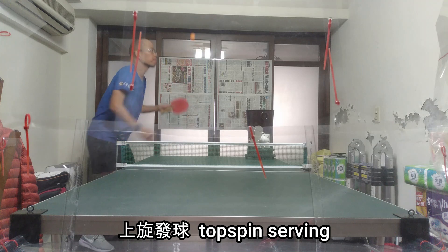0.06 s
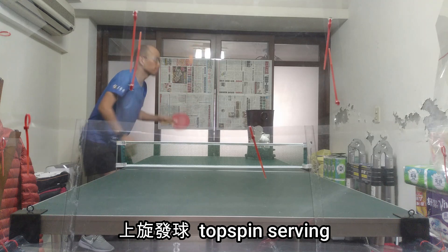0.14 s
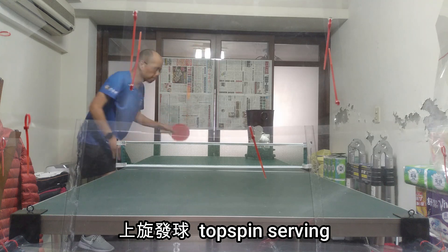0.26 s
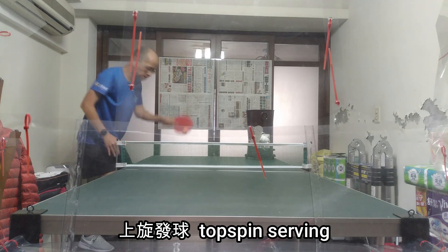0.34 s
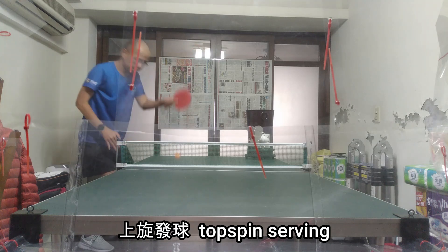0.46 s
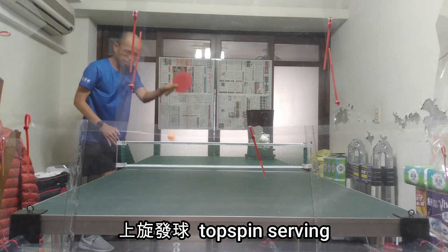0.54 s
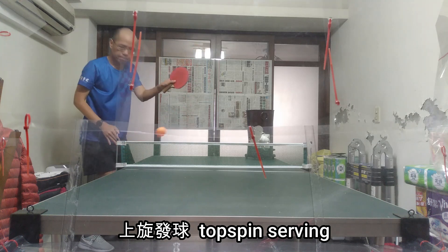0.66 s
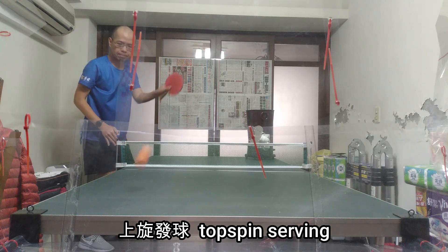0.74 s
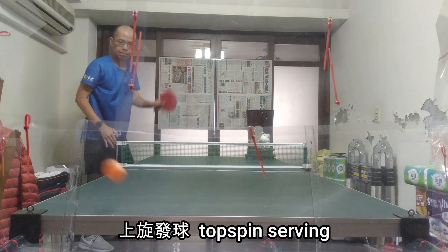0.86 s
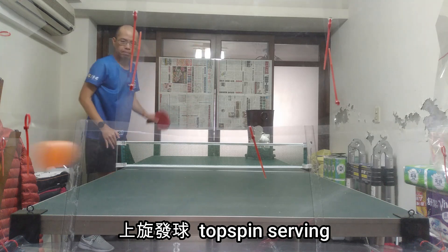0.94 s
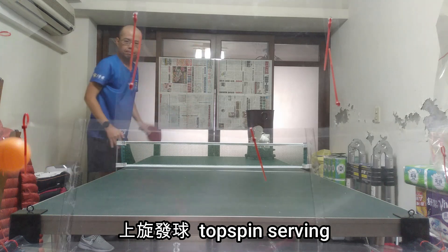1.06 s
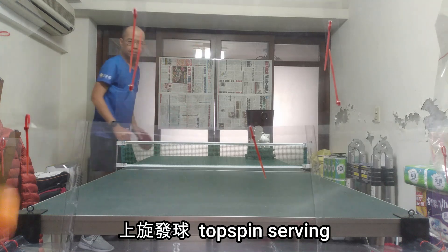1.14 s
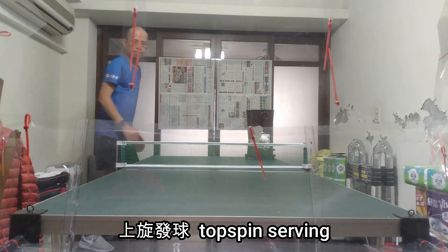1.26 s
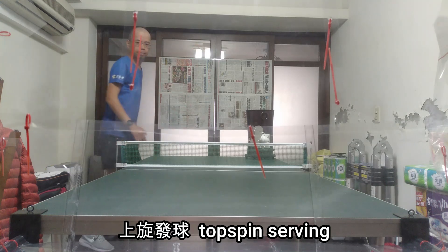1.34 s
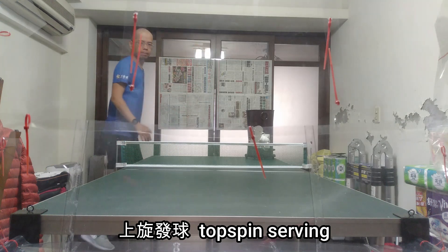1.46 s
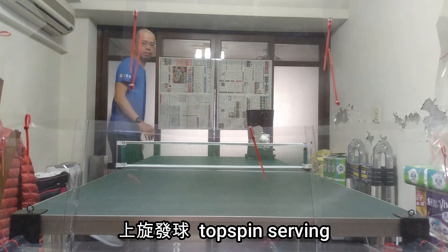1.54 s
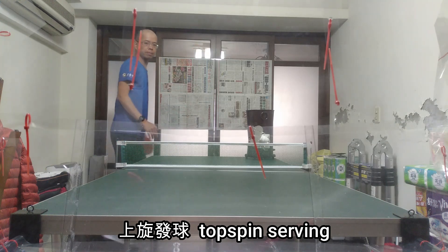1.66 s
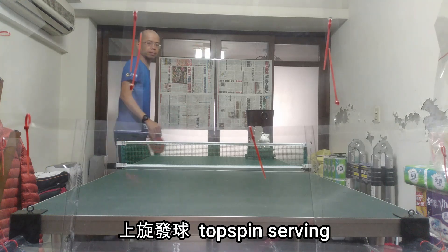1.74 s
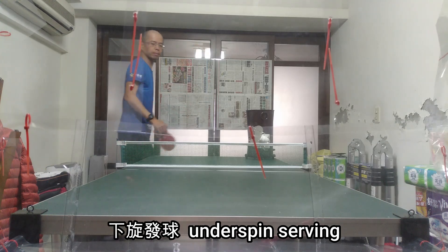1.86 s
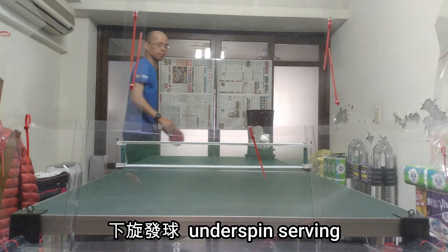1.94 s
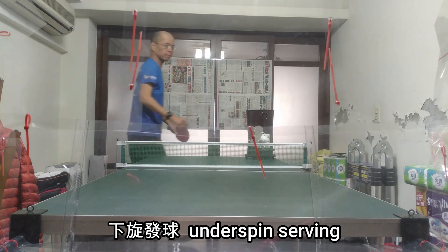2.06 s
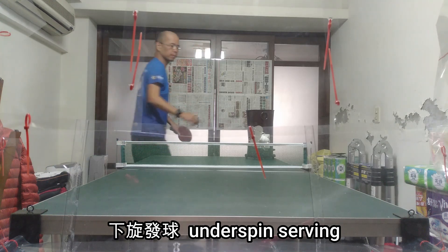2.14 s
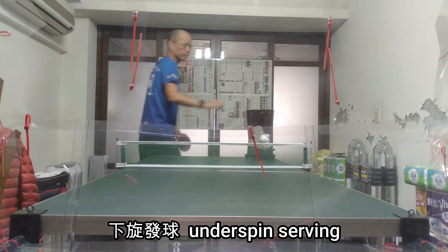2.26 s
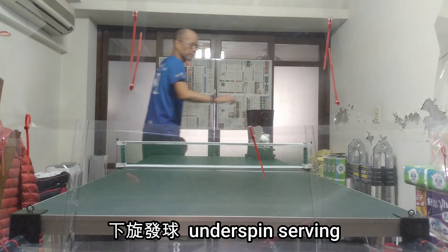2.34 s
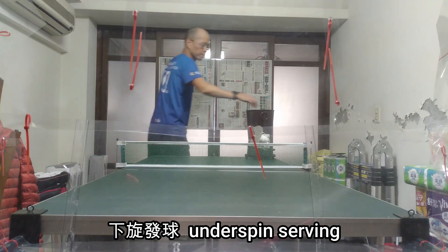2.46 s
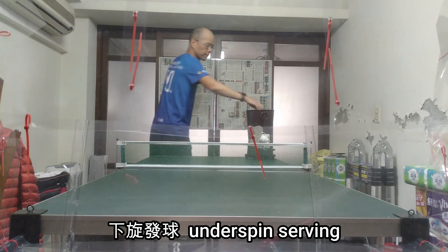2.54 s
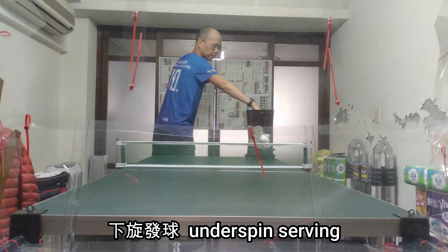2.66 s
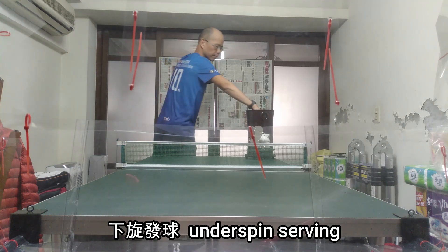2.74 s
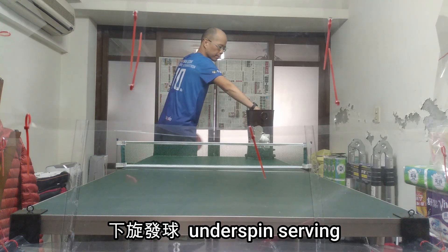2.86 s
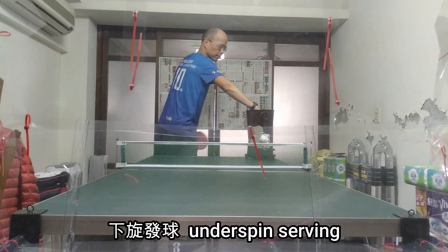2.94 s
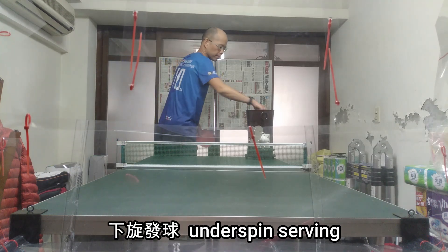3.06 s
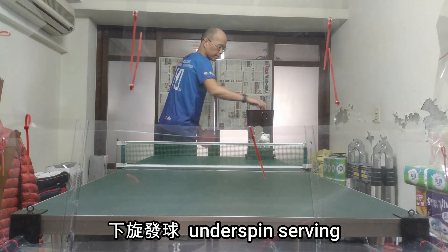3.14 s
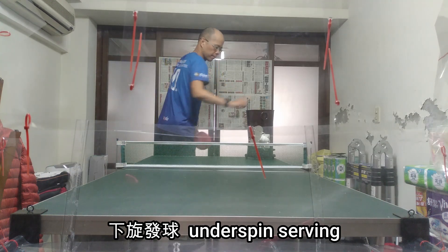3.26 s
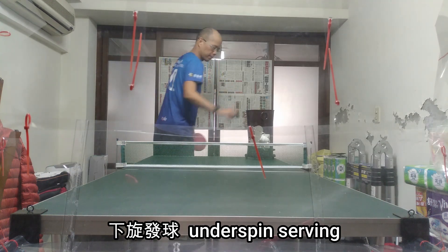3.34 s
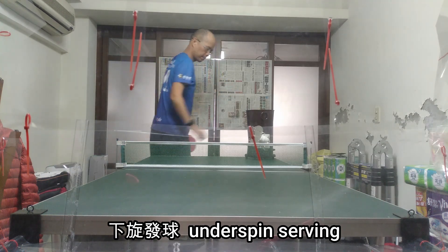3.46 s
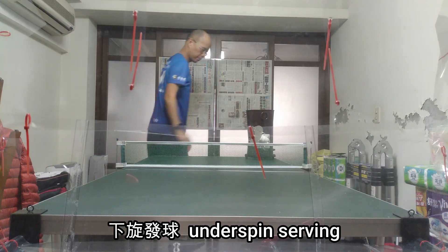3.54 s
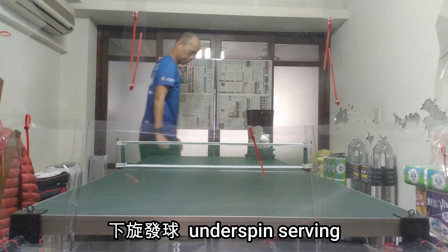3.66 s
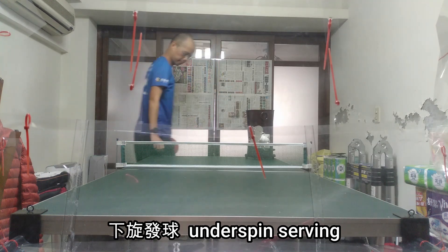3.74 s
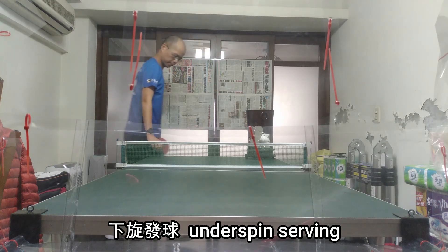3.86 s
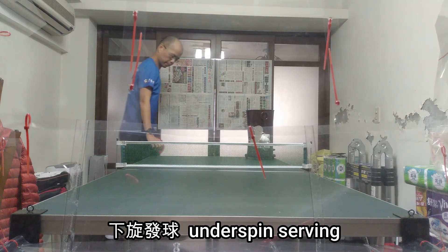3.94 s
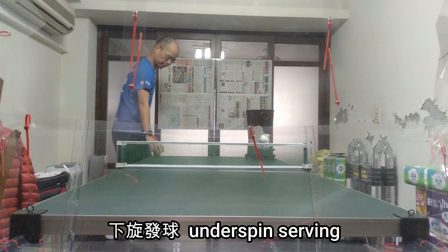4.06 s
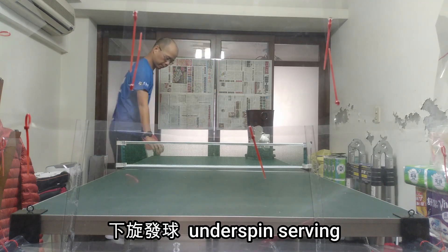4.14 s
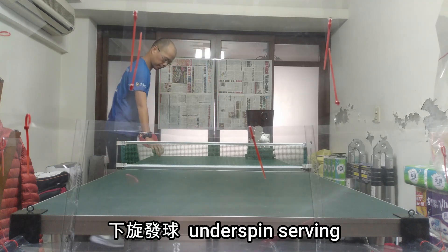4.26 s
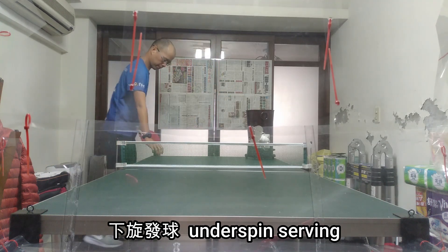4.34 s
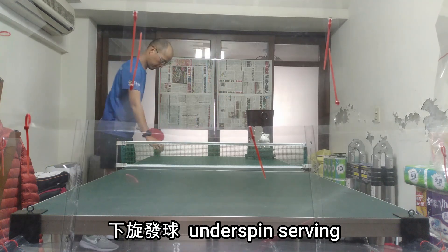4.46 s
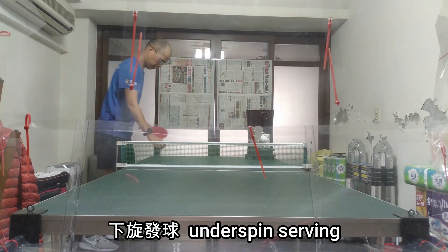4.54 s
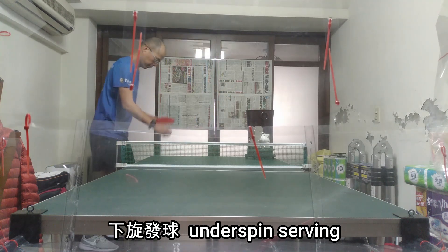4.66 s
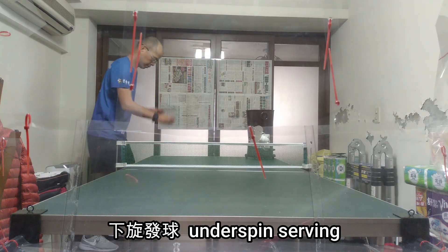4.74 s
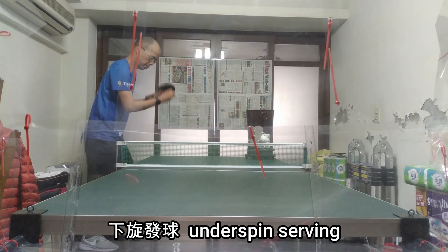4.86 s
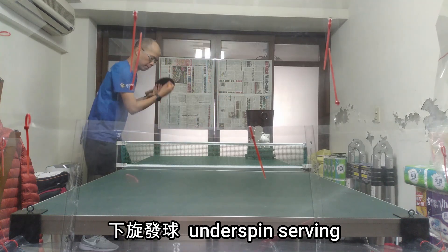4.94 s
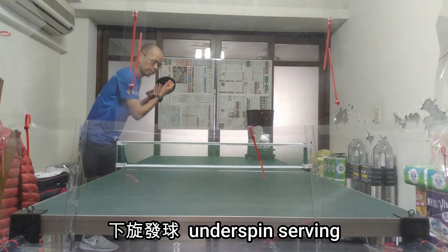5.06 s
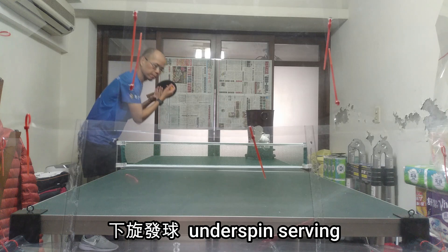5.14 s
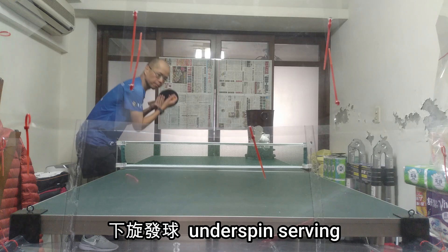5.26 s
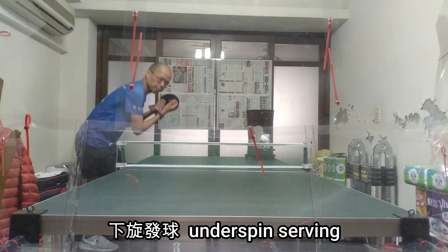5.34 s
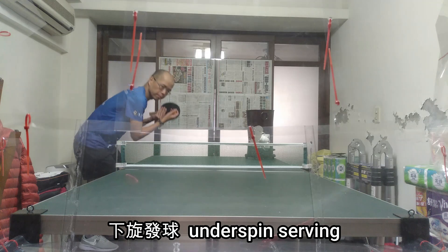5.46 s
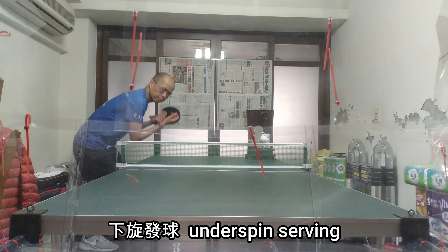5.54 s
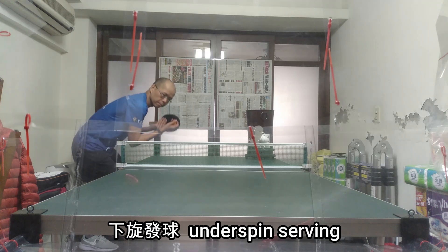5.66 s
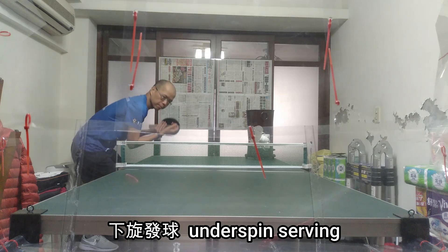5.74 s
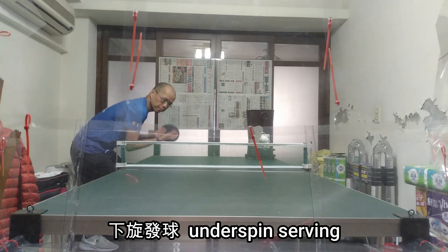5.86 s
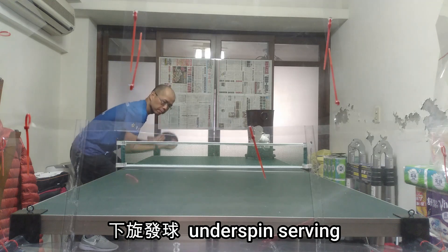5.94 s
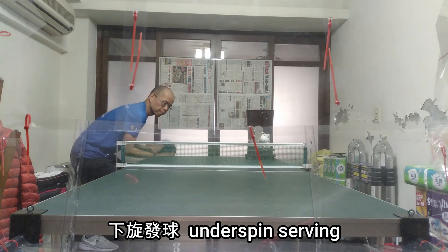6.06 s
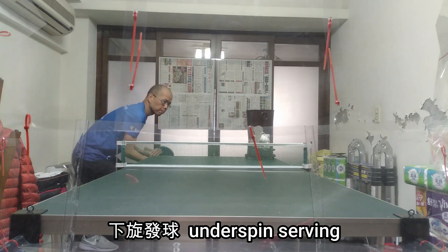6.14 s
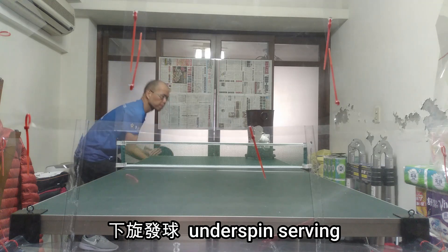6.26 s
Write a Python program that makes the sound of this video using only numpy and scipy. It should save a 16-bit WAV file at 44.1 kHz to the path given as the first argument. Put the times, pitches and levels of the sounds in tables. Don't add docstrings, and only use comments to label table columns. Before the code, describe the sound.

Small hard-walled room, one fixed microphone at the near end of a table. A hollow ball is struck and bounces crisply twice, hits the near panel with a loud dull smack, knocks it again, then falls to tile with tiny fading ticks. Later come faint basket clatter, two moderate ball bounces, soft footfalls and a short rubber squeak, over faint street rumble and hiss.

```python
import sys
import numpy as np
from scipy import signal
from scipy.fft import rfft, irfft
from scipy.io import wavfile
from scipy.ndimage import uniform_filter1d

SR = 44100
rng = np.random.default_rng(int(sys.argv[2]) if len(sys.argv) > 2 else 0)


def volts_from_db(level):
    exponent = np.asarray(level, float) / 20
    return 10 ** exponent


def unload_wav(signal):
    wavfile.write(
        sys.argv[1],
        SR,
        np.round(np.clip(np.atleast_2d(signal).T, -1, 1) * 32767).astype(np.int16),
    )


N = 277830
SIZE = 2 ** 15
HZ = np.fft.rfftfreq(SIZE, 1 / SR) + 1e-3


def colour(points, hz):
    at, db = np.transpose(points)
    return volts_from_db(np.interp(np.log(hz), np.log(at), db))


def causal(gain):
    ceps = irfft(np.log(gain + 1e-9))
    ceps[1:SIZE // 2] *= 2
    ceps[SIZE // 2 + 1:] = 0
    return np.exp(rfft(ceps))


def peak(hz, width_hz):
    return 1 / np.sqrt(1 + (2 * (HZ - hz) / width_hz) ** 2)


def band(x, lo_hz, hi_hz):
    sos = signal.butter(N=2, Wn=[lo_hz, hi_hz], btype="band", fs=SR, output="sos")
    y = signal.sosfilt(sos, x)
    return y / y.std()


def add(mix, s, sound):
    i = int(s * SR)
    mix[i:i + len(sound)] += sound[:N - i]


def ring(modes):
    t = np.arange(SIZE) / SR
    y = np.zeros(SIZE)
    for hz, db, t60 in modes:
        decay = volts_from_db(db - 60 * t / np.clip(t60, .01, .3))
        y += decay * np.sin(2 * np.pi * hz * t)
    return y / y[:SR // 20].std()


# f/Hz, t60/s, build-up/ms
ROOM = [(88.4, 0.44, 31), (172, 0.53, 10), (389.3, 0.41, 2.8), (1000, 0.49, 7.4), (2500, .5, 4),
        (5500, 0.5, 5), (9000, .43, 1.7), (12000, 0.44, 5), (15000, 0.44, 4)]


def echo(direct_db, crack_s, click_db=-38.0):
    mirror_s, mirror_db = .0016, -1.5
    t = np.arange(SIZE) / SR
    noise, luck, crack = rng.standard_normal(SIZE), rng.random(SIZE), rng.standard_normal(SIZE)
    density = np.clip(0.28 + (t / .03) ** 2, 0, 1)
    spectrum = rfft(noise * (luck < density) / np.sqrt(density))
    centres = np.log(np.array(ROOM)[:, 0])
    tail = np.zeros(SIZE)
    for k, (_, t60, rise_ms) in enumerate(ROOM):
        mask = np.interp(np.log(HZ), centres, np.arange(len(ROOM)) == k)
        envelope = volts_from_db(-60 * t / t60) * (1 - np.exp(-1000 * t / rise_ms))
        tail += irfft(spectrum * mask) * envelope
    crack = crack * np.exp(-t / crack_s) * (1 - np.exp(-t / 0.0012))
    click = volts_from_db(click_db) * (1 + volts_from_db(mirror_db) * np.exp(-2j * np.pi * HZ * mirror_s))
    tail = tail / np.linalg.norm(tail)
    crack = volts_from_db(direct_db) * crack / np.linalg.norm(crack)
    return click + rfft(tail + crack)


# f/Hz, width/Hz, level/dB
BOOM = [(98, 13, -24.5), (136.5, 9.9, 3), (215.5, 36, -8.5), (273.1, 25, -8)]
# f/Hz, width/Hz
SHELL = [(8290, 56), (8470, 74)]


def knocks(rows, tone, fill, offset_db, lead_s, boom_db, contact_ms=.6, harden=0., crack_s=.006,
           dull_hz=19000, rings=None, ring_db=0., click_db=-37.0):
    mix = np.zeros(N)
    modes = sum(volts_from_db(db) * peak(hz, 1.3 * width) ** 3 for hz, width, db in BOOM)
    boom = causal(modes * np.minimum(HZ / 75, 1) ** 2)
    shell = sum(peak(hz, width) ** 2 for hz, width in SHELL)
    null = 1 - 0.88 * peak(9230, width_hz=480) ** 2
    blur = np.clip(fill * (2500 / HZ) ** 1.2, 0, 1)
    for s, db, direct_db, *shell_db in rows:
        touch_ms = contact_ms * volts_from_db(-harden * (db - rows[0][1]))
        turns = 2 * HZ * touch_ms / 1000
        contact = np.cos(np.pi * turns / 2) * (1 + turns ** 2) / (1 - turns ** 2)
        heard_hz = HZ * touch_ms / .6
        body = colour(tone, heard_hz) * np.minimum(heard_hz / tone[0][0], 1) ** 2
        body = body / np.sqrt(1 + (HZ / dull_hz) ** 4)
        gain = body * np.sqrt((1 - blur) * (null * contact) ** 2 + blur)
        gain = gain + sum(volts_from_db(lift) for lift in shell_db) * shell
        sound = irfft(causal(gain) * echo(direct_db, crack_s, click_db) + volts_from_db(boom_db) * boom)
        sound = sound / sound[:SR // 20].std()
        if rings:
            sound = sound + volts_from_db(ring_db) * ring(rings)
        add(mix, s - lead_s, sound * volts_from_db(db + offset_db))
    return mix


# f/Hz, level/dB, t60/s
PADDLE = [(0.383, -23, -5, -14.5)]
PADDLE_TONE = [(300, -19.5), (440, -30.5), (540, -4), (750, -10), (1080, 0.4), (1500, -6.5), (2200, -11.5),
               (3450, -27), (7400, -26.5), (10000, -30), (15500, -43.5)]
PADDLE_RINGS = [(1083, 0, 0.35), (1206, -1.5, 0.71), (1440, -3.5, 0.21), (2170, -31, 5.0),
                (2422, -8, 0.083)]


def paddle():
    return knocks(PADDLE, PADDLE_TONE, fill=6.7, offset_db=-9.5, lead_s=0.0025, boom_db=-26,
                  crack_s=0.0084, click_db=-16, rings=PADDLE_RINGS, ring_db=-7)


# t/s, level/dB, direct/dB, shell ring/dB
TABLE = [
    (.505, -20, -8.5, -6.5),
    (.855, -21.5, -16, -20),
]
# f/Hz, level/(dB per Hz)
TABLE_TONE = [(110, -16), (170, -1.5), (380, -3), (800, 0.5), (1350, -7), (3300, -14.5), (5000, -15),
              (7000, -16.5), (9800, -17), (11400, -25), (15500, -42.5)]


def table():
    return knocks(TABLE, TABLE_TONE, fill=0.29, offset_db=-9.5, lead_s=0.0017, boom_db=8,
                  click_db=-18.5, contact_ms=.606, harden=0.24)


# t/s, level/dB
HUMS = [
    (.515, -36.5),
    (1.07, -40),
    (1.29, -56.5),
]


def hums():
    hum_hz, rise_s, t60_s = 91, 0.028, .75
    mix, t = np.zeros(N), np.arange(SIZE) / SR
    for s, db in HUMS:
        envelope = volts_from_db(db - 60 * t / t60_s) * (1 - np.exp(-t / rise_s))
        add(mix, s, envelope * np.sin(2 * np.pi * hum_hz * t))
    return mix


# t/s, level/dB, direct/dB, shell ring/dB
PANEL = [
    (1.029, -10.5, -1, -39),
    (1.291, -18, -15.5, -50),
]
# f/Hz, level/(dB per Hz)
PANEL_TONE = [(60, -7.5), (240, -9), (450, -7), (640, -2.5), (950, -6), (1700, -7.5), (3000, -12),
              (7000, -19), (8200, -32.5), (11000, -45.5), (15500, -52)]
# f/Hz, level/dB, t60/s
PANEL_RINGS = [(604, 0, 0.25), (799, 0, 0.17), (1245, -6, 0.56), (1750, -9, 5.0), (2300, -30, 5.0)]


def panel():
    return knocks(PANEL, PANEL_TONE, fill=7, offset_db=-12.5, lead_s=0.0004, boom_db=-5.5,
                  contact_ms=.59, crack_s=0.0024, click_db=-12, rings=PANEL_RINGS, ring_db=-8)


# t/s, level/dB, direct/dB, shell ring/dB
TILE = [(1.6085, -27, -9.5, -45)]
# f/Hz, level/(dB per Hz)
TILE_TONE = [(200, -19), (600, -6.5), (1300, -3.5), (2500, -8.5), (3800, -11), (4500, -21), (7000, -18.5),
             (8200, -33.5), (15500, -45.5)]
# f/Hz, level/dB, t60/s
TILE_RINGS = [(582, -3, 0.2), (1180, -11, 0.03), (1253, -1, 0.16), (1870, -11, 0.17), (3220, -16, 5.0)]


def tile():
    return knocks(TILE, TILE_TONE, fill=9, offset_db=-15, lead_s=0.00036, boom_db=1.5,
                  contact_ms=.601, crack_s=0.0028, rings=TILE_RINGS, ring_db=-5.5, click_db=-6.5)


# t/s, level/dB, direct/dB, shell ring/dB
ROLL_OFF = [(1.7175, -46, -10, -17), (1.843, -50.5, -3, -1), (1.857, -52.5, -15, 7), (1.983, -56.5, -9, -7)]
# f/Hz, level/(dB per Hz)
ROLL_TONE = [(300, 0.5), (1200, 0), (3200, -1.5), (5000, -9.5), (7000, -6), (9800, -3), (12000, -10.5),
             (15500, -23)]


def roll_off():
    return knocks(ROLL_OFF, ROLL_TONE, fill=0.3, offset_db=-11.5, lead_s=0.00117, boom_db=-30,
                  contact_ms=0.632, crack_s=0.0014)


# t/s, level/dB, direct/dB, shell ring/dB
BASKET = [(.029, -50, 0, -42), (2.745, -45, -12, -29), (2.762, -50, -14, -26), (2.777, -41, -8, -26),
          (2.826, -42, -28, -29), (2.877, -36, -20, -23), (2.939, -40.5, -5, -40), (2.979, -44, -28, -42)]
FLICK = [(2.727, -51.5, -5, -22)]
PICK_UP = [(3.092, -37, -14, -16), (3.118, -36, -10, -20), (3.149, -57, 14, -24), (3.255, -44, -4.5, -36),
           (4.998, -60.5, -1, -40)]
# f/Hz, level/(dB per Hz)
BASKET_TONE = [(250, -4), (480, -6.5), (640, -0.5), (900, 2), (1400, -7), (3000, -15.5), (5300, -24.5),
               (9000, -20.5), (15500, -37)]
# f/Hz, level/dB, t60/s
BASKET_RINGS = [(658, 2, 0.23), (735, -5, 0.14), (890, -10, .1)]
PICK_RINGS = [(663, 1, .15), (892, -1, .12), (1085, -8, 0.24), (1330, -7, 0.14)]


def basket():
    mix = knocks(BASKET, BASKET_TONE, fill=0.88, offset_db=-14, lead_s=0.0016, boom_db=-34,
                 contact_ms=0.69, harden=0.069, dull_hz=8000, rings=BASKET_RINGS, ring_db=-5.5)
    mix += knocks(FLICK, BASKET_TONE, fill=0.64, offset_db=-12, lead_s=0.00128, boom_db=-26,
                  contact_ms=0.19, dull_hz=8100)
    mix += knocks(PICK_UP, BASKET_TONE, fill=1.0, offset_db=-13, lead_s=0.001195, boom_db=-28,
                  contact_ms=0.49, harden=0.11, dull_hz=8200, rings=PICK_RINGS, ring_db=-4.5)
    return mix


# t/s, level/dB, direct/dB, shell ring/dB
DRIBBLE = [
    (4.1115, -25.5, -8.5, -18),
    (4.318, -29, -10.5, -7),
]
# f/Hz, level/(dB per Hz)
DRIBBLE_TONE = [(120, 5), (400, -4.5), (800, -4.5), (1250, -0.5), (1900, -13), (3300, -15), (6500, -17.5),
                (9800, -21.5), (12000, -29), (15500, -44)]
# f/Hz, level/dB, t60/s
DRIBBLE_RINGS = [(882, -1, 0.26), (1416, 3, 0.12), (1910, -5, 0.062)]


def dribble():
    return knocks(DRIBBLE, DRIBBLE_TONE, fill=0.26, offset_db=-12.0, lead_s=0.00123, boom_db=-6.0,
                  contact_ms=0.607, click_db=-21, rings=DRIBBLE_RINGS, ring_db=-8.5)


# t/s, level/dB, direct/dB
STEPS = [(.036, -49.5, -14), (2.08, -49, -7), (2.096, -45, -5), (2.3, -59, -13), (3.9, -46.5, -6.5),
         (3.99, -52, 2), (4.482, -43, -7), (4.997, -42, -7.5), (5.088, -46.5, -12), (5.179, -51, -5)]
# f/Hz, level/(dB per Hz)
STEP_TONE = [(60, -5), (120, 1), (257, -9), (730, -29), (1300, -32.5), (2250, -50), (6500, -55),
             (9000, -62)]


def steps():
    return knocks(STEPS, STEP_TONE, fill=9, offset_db=-8.5, lead_s=.002, boom_db=2.5,
                  contact_ms=0.78, harden=0.074)


# t/s, length/s, level/dB, hiss bottom f/Hz, squeak/dB
SCUFFS = [(0.035, 0.036, -86, 5060, -23), (2.237, 0.033, -73, 496, -17), (3.769, 0.048, -74.5, 4220, -21),
          (3.79, 0.067, -69.5, 590, -24), (4.655, 0.027, -82, 5500, -35), (4.691, 0.027, -71.5, 4830, -35),
          (4.72, .06, -57, 4070, 1), (5.001, 0.033, -73.5, 4230, -15)]


def scuffs():
    squeak_hz, squeak_rise = 2210, 0.61
    mix = np.zeros(N)
    for s, length, db, hiss_hz, squeak_db in SCUFFS:
        t = np.minimum(np.arange(SIZE) / (length * SR), 1)
        grit, wobble = rng.standard_normal((2, SIZE))
        hiss = band(band(grit, hiss_hz, 7260), hiss_hz, 7260)
        phase = 2 * np.pi * np.cumsum(squeak_hz * (1 + squeak_rise * t)) / SR
        rough = 1.1 + band(wobble, 35, 400)
        squeak = rough * (np.sin(phase) + 0.55 * np.sin(2 * phase))
        envelope = np.abs(np.sin(np.pi * t ** 0.78)) ** 0.38 * (t < 1)
        drag = (hiss + volts_from_db(squeak_db) * squeak) * envelope
        sound = irfft(rfft(drag) * echo(direct_db=0.42, crack_s=0.0015))
        add(mix, s, sound * volts_from_db(db) / sound[:SR // 10].std())
    return mix


def walk(rate_hz):
    k = int(SR / rate_hz)
    held = np.repeat(rng.standard_normal(N // k + 1), k)
    return uniform_filter1d(uniform_filter1d(held, k), k)[:N]


# peak t/s, level/dB, rise/s, fall/s
SWELLS = [(.07, -55.5, .05, 0.071), (1.04, -63, .02, .03), (1.9, -66.5, 0.12, 0.17), (2.85, -61, 0.05, .06),
          (3.05, -49, .07, 0.082), (3.28, -49.5, .1, .2), (3.85, -61.5, 0.17, .05),
          (4.02, -41, 0.059, 0.073), (4.51, -52, 0.033, 0.07), (4.8, -65, .05, 0.056),
          (5.02, -59, .04, .12), (5.75, -66, 0.24, .1), (6.2, -67.5, 0.23, 0.094)]
# t/s, level/dB
STIR = [(0, -1.5), (.3, -2), (1.5, 3), (1.95, -4.5), (2.4, 5), (2.65, -3), (2.9, 5), (3.5, -5), (4.0, 2.5),
        (5.1, -2.5), (5.35, -4), (6.3, -5.5)]
# f/Hz, level/(dB per Hz)
HISS = [(150, -11.5), (200, -3), (310, -9.5), (480, -8), (4080, -20), (8000, -29), (12600, -35.5),
        (13000, -46), (16000, -59.5)]


def background():
    street_db, modes_db, hiss_db = -66.5, -66.5, -70
    hiss_follow = .15
    t, hz = np.arange(N) / SR, np.fft.rfftfreq(N, 1 / SR) + 1
    swell = np.ones(N)
    for s, db, rise, fall in SWELLS:
        swell += volts_from_db(db - street_db) * np.exp(np.where(t < s, (t - s) / rise, (s - t) / fall))
    low = band(rng.standard_normal(N), 44, 64) * volts_from_db(street_db - 2) * swell
    stir_db = np.interp(t, *np.transpose(STIR))
    push = rng.standard_normal(N)
    modes = sum(band(push, f - 1.4 * width, f + 0.98 * width) for f, width, _ in BOOM[:2])
    upper = 0.56 * band(push, 53, 210) + 0.62 * modes
    upper = upper * volts_from_db(modes_db + stir_db + 1.6 * walk(3.2))
    hiss = irfft(rfft(rng.standard_normal(N)) * colour(HISS, hz), N)
    hiss = hiss / hiss.std() * volts_from_db(hiss_db + hiss_follow * stir_db + 1.2 * walk(5))
    return low + upper + hiss


def scene():
    ball = paddle() + table() + hums() + panel() + tile() + roll_off() + basket() + dribble()
    feet = steps() + scuffs()
    return (ball + feet + background())[None]


def low_pass(x):
    return signal.sosfilt(signal.butter(12, 16390, fs=SR, output="sos"), x)


# t/s, half width/s
CUTS = [
    (0.0, 0.0022),
    (2.694, 0.01),
    (6.027, 0.0045),
]


def record(dry):
    t = np.arange(N) / SR
    fades = np.prod([np.clip(np.abs(t - s) / half, .25, 1) for s, half in CUTS], axis=0)
    rounded = np.tanh(1.523 * dry) / 1.524 * fades
    bass_cut = signal.butter(N=5, Wn=44, btype="high", fs=SR, output="sos")
    top_cut = signal.ellip(8, .2, 60, 15750, fs=SR, output="sos")
    heard = signal.sosfilt(top_cut, signal.sosfilt(bass_cut, rounded))
    return low_pass(heard)


dry = scene()
out = record(dry)
unload_wav(out)
```